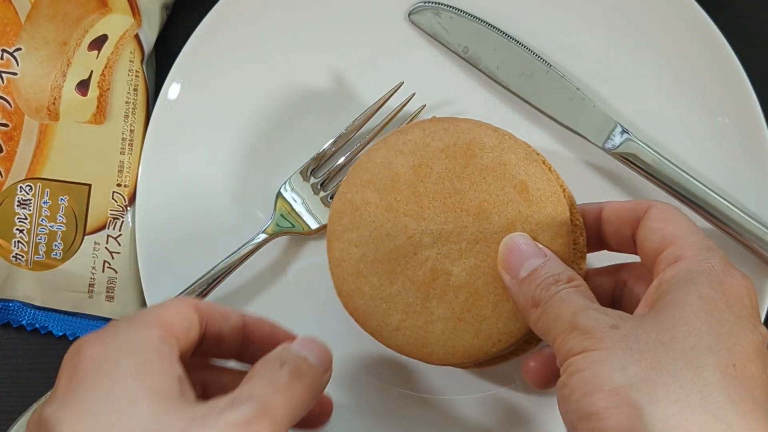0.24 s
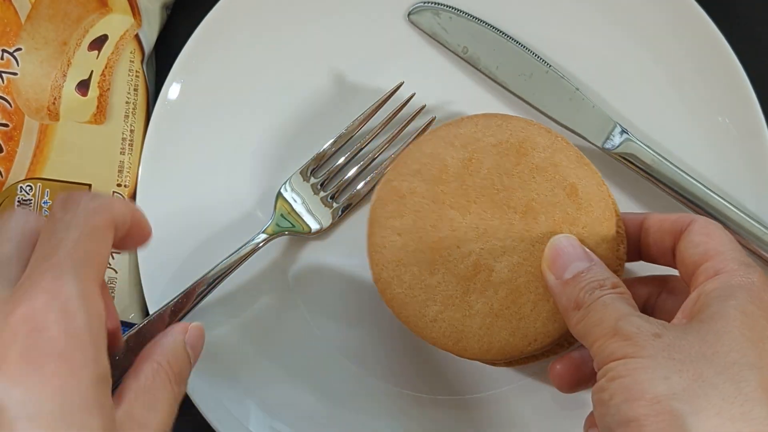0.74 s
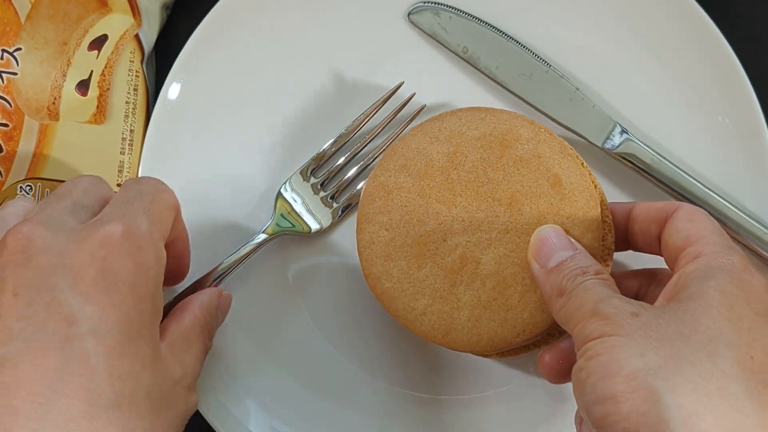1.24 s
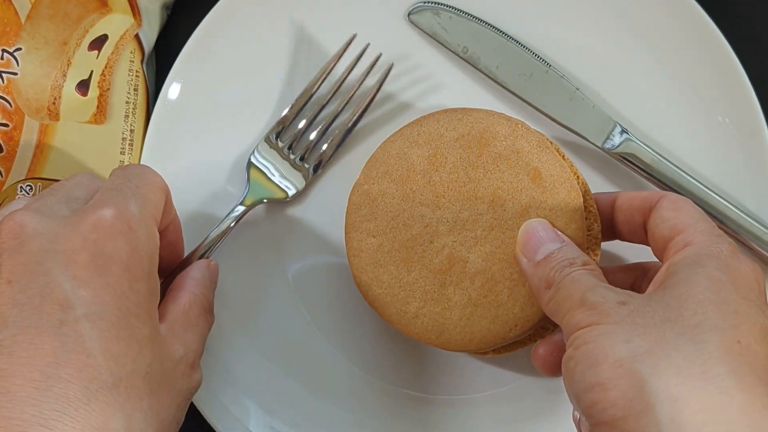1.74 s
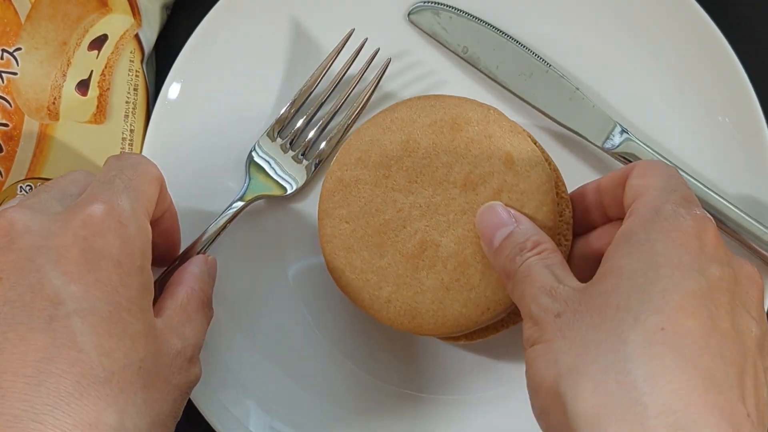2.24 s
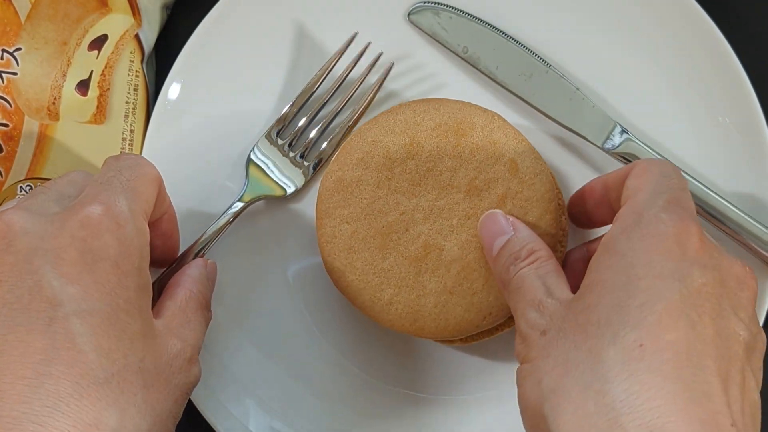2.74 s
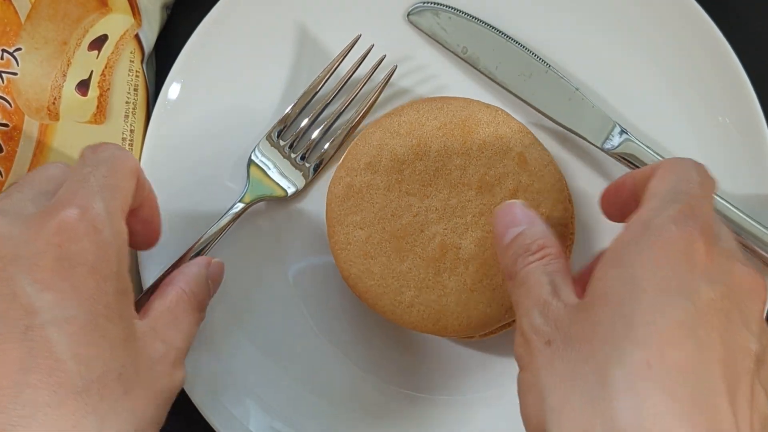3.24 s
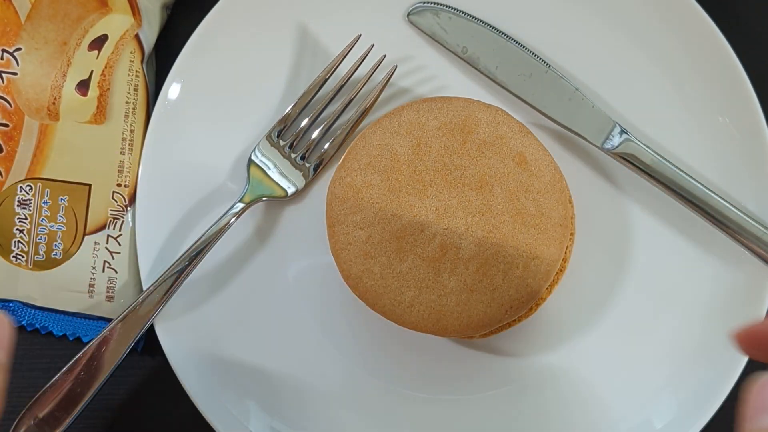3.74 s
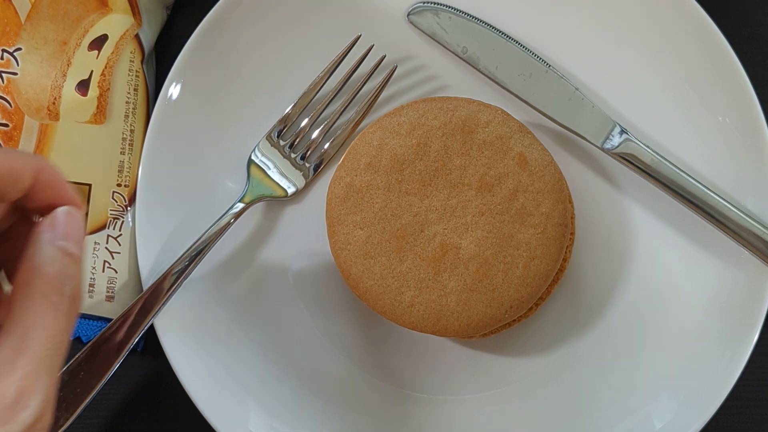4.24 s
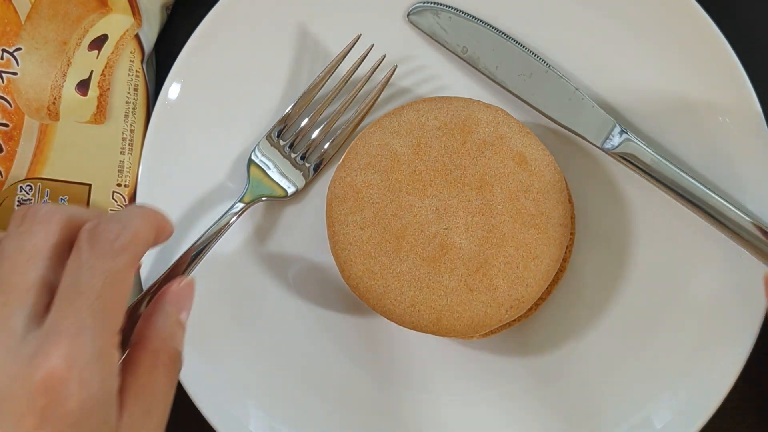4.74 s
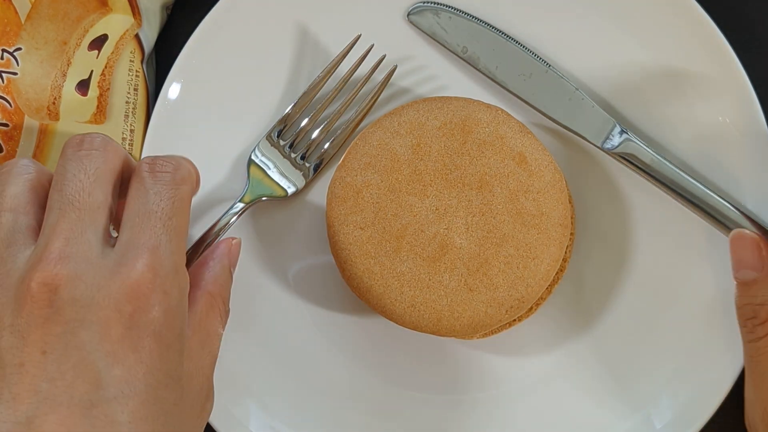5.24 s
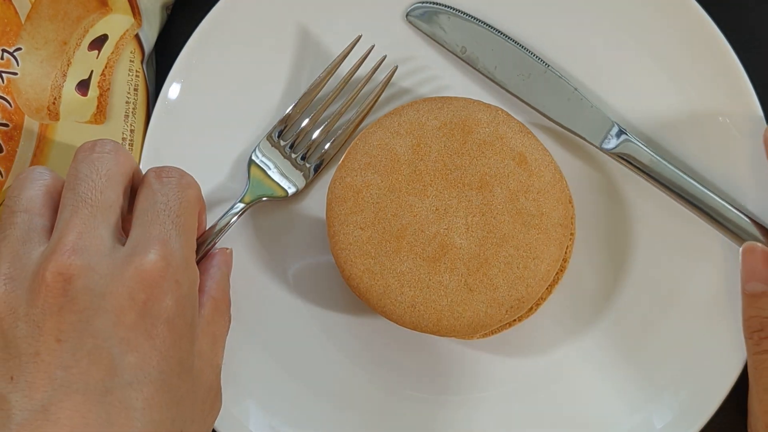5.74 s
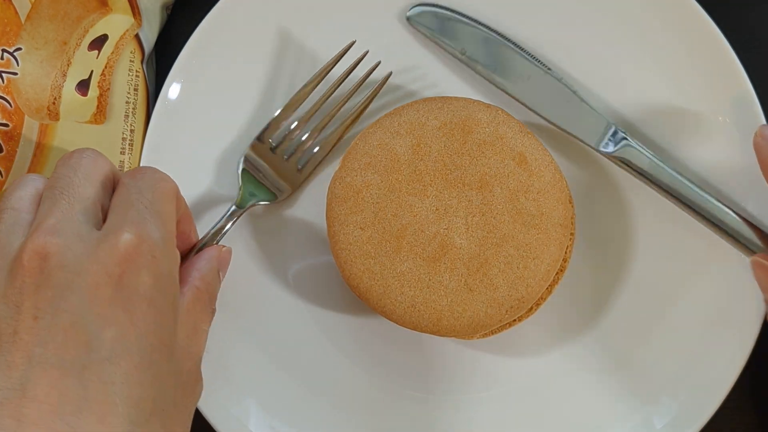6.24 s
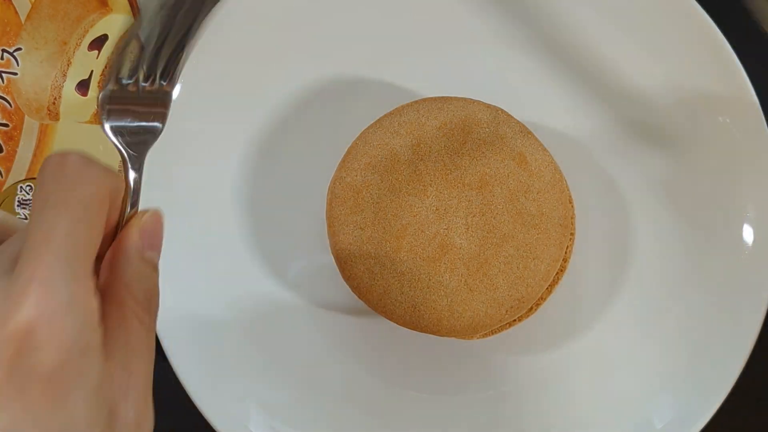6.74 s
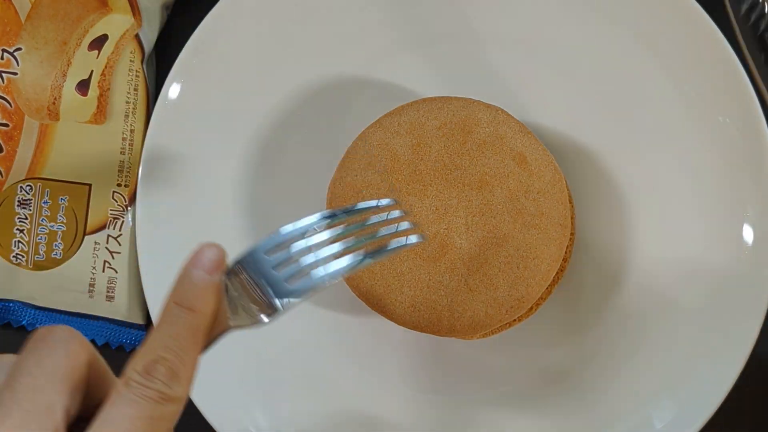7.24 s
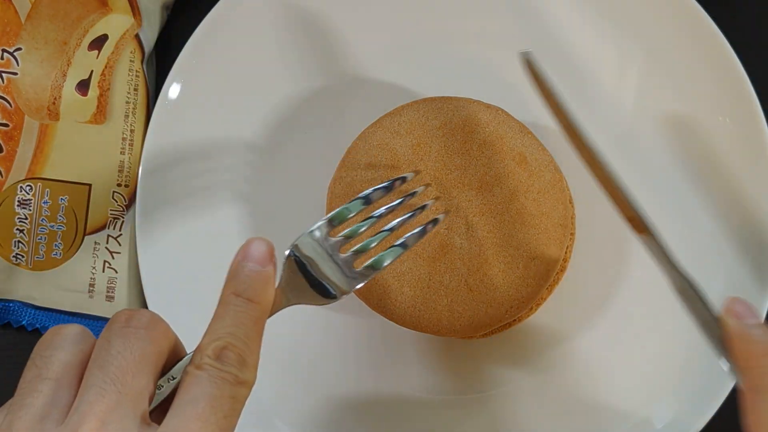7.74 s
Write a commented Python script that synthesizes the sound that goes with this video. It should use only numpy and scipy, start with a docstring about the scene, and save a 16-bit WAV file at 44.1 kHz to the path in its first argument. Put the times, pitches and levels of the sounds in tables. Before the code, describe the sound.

A steel fork and knife are nudged on a ceramic plate, close to the microphone. A sharp clink comes first, then light taps and small squeaky slides, then the loudest clink, which leaves the steel ringing. Hands knock and scuff softly on the table before one more bright clink and a short scrape as the cutlery is lifted. The room is quiet, with a faint motor hum.

```python
"""A sharp clink of steel on a ceramic plate, then more taps, rattles and slides of a fork and knife,
heard by a close pair of microphones. Each impact chatters briefly and excites the normal modes of the
plate and of the table, which thuds; free steel parts ring on, and sliding steel squeaks by stick-slip
friction. Hands scuff the table and a sleeve rustles. Behind them, in a quiet room with a short
reverberation, a small motor hums and a faint band of noise chirps upward again and again."""
import sys
import numpy as np
from scipy import signal
from scipy.fft import rfft, irfft
from scipy.io import wavfile
from scipy.ndimage import uniform_filter1d

SR = 44100
rng = np.random.default_rng(int(sys.argv[2]) if len(sys.argv) > 2 else 0)


def to_wav(sig):
    """Store sig (one row per channel, or 1-D mono) as 16-bit WAV at the path in sys.argv[1].

    Samples outside -1..1 are clipped; the rate is SR.
    """
    pcm = np.clip(np.atleast_2d(sig), -1, 1) * 32767
    pcm = np.round(pcm).astype(np.int16)
    wavfile.write(sys.argv[1], SR, pcm.T)  # frames by channels


N = 352834
TIME = np.arange(N) / SR
BIN_HZ = np.maximum(np.arange(N // 2 + 1) * SR / N, 1)
MIC_LAG_S = .00017  # path difference: the right microphone hears the plate later


def undb(db):
    return 10 ** (np.asarray(db) / 20)


def unit_rms(x):
    return x / np.sqrt(np.mean(x ** 2))


def unit_energy(x):
    return x / np.sqrt(np.sum(x ** 2))


def add(out, x, start_s):
    """Superposition: x is summed into out from start_s on."""
    i = int(start_s * SR)
    out[:, i:i + x.shape[1]] += x[:, :N - i]


def drive(force, response):
    """Convolution: a linear body answers each impulse of force with its impulse response."""
    return signal.fftconvolve(force[None], response, axes=1)[:, :N]


def colour(x, points):
    """Spectral shaping by (f/Hz, gain/dB) points, normalised to unit rms."""
    hz, db = np.transpose(points)
    f = np.maximum(np.arange(x.shape[-1] // 2 + 1) * SR / x.shape[-1], 1)
    return unit_rms(irfft(rfft(x) * undb(np.interp(np.log(f), np.log(hz), db)), x.shape[-1]))


def wander(rate_hz):
    """Random modulation: smoothed steps with a spread near 1."""
    k = int(SR / rate_hz)
    steps = np.repeat(rng.standard_normal(N // k + 1), k)
    return 1.5 * uniform_filter1d(uniform_filter1d(steps, k), k)[:N]


def impulses(samples, per_s, spread_db):
    """Poisson process: sparse contacts of random sign and size."""
    hit = rng.random(samples) < per_s / SR
    sign = rng.choice([-1, 1], samples)
    return hit * sign * undb(spread_db * np.minimum(rng.exponential(size=samples), 3))


def envelope(strokes, rise_db_s, fall_db_s, column=2):
    """Exponential growth and decay on either side of each stroke's held level."""
    rows = np.array(strokes)[:, :, None]
    early = np.maximum(rows[:, 0] - TIME, 0)
    late = np.maximum(TIME - rows[:, 0] - rows[:, 1], 0)
    return undb((rows[:, column] - rise_db_s * early - fall_db_s * late).max(0))


# anchors of a five-band tone colour: f/Hz
COLOUR_HZ = [1000, 2000, 3500, 6500, 12000]
def ring(modes, length_s, colour_db=(0,) * 5, scatter_db=0, detune=0, spread_rad=.6, lag_s=MIC_LAG_S):
    """Modal superposition: damped sinusoids, each with its own phase at the two microphones."""
    hz, db, t60 = np.transpose(modes)[:, :, None]
    t = np.arange(int(length_s * SR)) / SR
    level_draw, spread_draw, phase_draw, pitch_draw = rng.standard_normal((4, len(hz), 1))
    hz = hz * (1 + detune * pitch_draw)
    db = db + np.interp(np.log(hz), np.log(COLOUR_HZ), colour_db) + scatter_db * level_draw
    decay = undb(db - 60 * t / t60)
    phase = 2 * np.pi * hz * t + 3 * phase_draw
    apart = np.pi * hz * lag_s + spread_rad * np.minimum(hz / 2000, 1) * spread_draw
    return np.array([(decay * np.sin(phase + side * apart)).sum(0) for side in (1, -1)])


# spectrum of the room air: f/Hz, relative density/dB
AIR_SPECTRUM = [(15, -36.5), (32, -15.5), (55, -3.5), (80, -13.5), (92, -8.5), (114, -3.5), (134, -24),
                (158, -13), (191, -18.5), (431, -19), (849, -31), (1350, -37), (3570, -45.5),
                (16300, -62.5)]
# likeness of the air at the two microphones: f/Hz, correlation
AIR_COHERENCE = [(40, 0.97), (130, 0.86), (290, 0.7), (640, 0.53), (1410, 0.12), (3100, 0.033),
                 (15000, 0.02)]
def air():
    """Spatial coherence: ambient noise is alike at both microphones where its wavelength is long."""
    hz, correlation = np.transpose(AIR_COHERENCE)
    alike = np.interp(np.log(BIN_HZ), np.log(hz), correlation)
    mid, side = rfft(rng.standard_normal((2, N)))
    pair = irfft(np.sqrt(1 + alike) * mid + np.sqrt(1 - alike) * side * np.array([[1], [-1]]), N)
    return colour(pair, AIR_SPECTRUM) * undb(-64.5 + wander(3.3))


# spectral lines of the motor: f/Hz, width/Hz, level/dB
MOTOR_LINES = [(49.4, 8.2, -66.5), (101.6, 5.1, -74), (161, 2.7, -80.5), (216, 1.4, -87)]
def motor_hum(start_db=-10, run_up_s=2):
    """Line broadening: each line is a narrow noise band that swells as the motor comes up to strength."""
    run_up_db = start_db * np.maximum(1 - TIME / run_up_s, 0)
    out = np.zeros(N)
    for hz, width, db in MOTOR_LINES:
        line = rfft(rng.standard_normal(N)) / (1 + (2 * (BIN_HZ - hz) / width) ** 2)
        out += undb(db + run_up_db) * unit_rms(irfft(line, N))
    return out


def chirps(start_s=2.97, period_s=.283, climb_s=.035, low_hz=1260, high_hz=1460, width_hz=120):
    """Frequency modulation: a narrow noise band climbs, fades and starts again, slowly growing fainter."""
    age = (TIME - start_s) % period_s
    hz = high_hz - (high_hz - low_hz) * np.exp(-age / climb_s)
    lowpass = signal.butter(2, width_hz / 2, fs=SR, output="sos")
    slow = signal.sosfilt(lowpass, rng.standard_normal((2, 2, N)))
    carrier = np.exp(2j * np.pi * np.cumsum(hz) / SR)
    band = unit_rms(np.real((slow[0] + 1j * slow[1]) * carrier))
    db = -80 - 9 * age / period_s - 1.2 * (TIME - start_s) + 4.5 * wander(14)
    return band * undb(db) * np.minimum(age / .0033, 1) * (TIME > start_s)


def reverberation(direct, t60_s=.28, level_db=-16, coherent_below_hz=700):
    """Diffuse reflection: the walls return a dull decaying tail, alike on both sides only in the bass."""
    t = np.arange(int(.5 * SR)) / SR
    tail = colour(rng.standard_normal((2, len(t))), [(100, -2), (2000, -1), (16000, -8.5)])
    lowpass = signal.butter(1, coherent_below_hz, fs=SR, output="sos")
    tail = tail + signal.sosfilt(lowpass, tail[0] - tail)
    tail *= undb(-60 * t / t60_s) * (t > .006)
    return undb(level_db) * drive(direct.mean(0), np.sqrt(2) * unit_energy(tail))


# sleeve movements: t/s, duration/s, level/dB
RUSTLES = [(3.5, 0.4, -87), (4.1, 0.42, -84), (6.68, .006, -74), (6.78, 0.034, -79), (6.915, 0.0055, -71.5),
           (6.99, .04, -80)]
# spectrum of rubbing cloth: f/Hz, relative density/dB
CLOTH_SPECTRUM = [(1500, 4.5), (4000, -4), (8000, -2.5), (12000, -2), (16000, -7)]
def sleeve():
    """Friction noise: cloth gives a soft hiss with a slight grain."""
    grainy = rng.standard_normal((2, N)) * undb(2 * wander(60))
    return colour(grainy, CLOTH_SPECTRUM) * envelope(RUSTLES, rise_db_s=350, fall_db_s=264)


# modes of the table top: f/Hz, relative level/dB, free T60/s
TABLE_MODES = [(95, -13.5, .12), (177, -5.5, 0.19), (266, -3.5, 0.11), (316.4, -4.5, .13),
               (437, 0.5, 0.082), (579, -1.5, 0.072), (684, -5, 0.11)]
def table_pushed(bass_cut_hz=450):
    """Damped impulse response: a soft push gives a gradual onset, little bass and a short decay."""
    modes = [(hz, db + 9 * np.log2(min(hz / bass_cut_hz, 1)), .33 * t60) for hz, db, t60 in TABLE_MODES]
    response = ring(modes, .1)
    return response * np.minimum(TIME[:response.shape[1]] / .0013, 1) ** 2


def table_struck(thud_db):
    """Modal excitation: a heavier blow reaches the deeper modes of the table."""
    bass_db_per_octave = 2 + .15 * thud_db
    modes = [(hz, db + bass_db_per_octave * np.log2(300 / hz), t60) for hz, db, t60 in TABLE_MODES]
    return ring(modes, .25, scatter_db=1)


# hand and handle dragging on the table: t/s, duration/s, knock/dB, hiss/dB, treble hiss/dB
SCUFFS = [(4.535, 0.012, -48.5, -48, -53), (4.63, 0.014, -63, -65, -71), (4.72, 0.081, -75.5, -84, -80.5),
          (5.355, .085, -51.5, -66.5, -76.5), (5.475, 0.031, -66, -83, -77.5),
          (5.527, 0.0034, -47.5, -64.5, -74), (5.635, 0.031, -69.5, -91, -85)]
# spectrum of the scuffing hiss: f/Hz, relative density/dB
SCUFF_SPECTRUM = [(600, -16.5), (1150, -16), (1900, -4), (2800, 4.5), (4500, -12), (7000, -44.5)]
def scuffs():
    """Roughness excitation: dragging knocks the table's modes unevenly; skin and steel hiss in grains."""
    knock_gain, hiss_gain, treble_gain = (
        envelope(SCUFFS, rise_db_s=900, fall_db_s=418, column=k) for k in (2, 3, 4))
    table = table_pushed()
    knock = unit_rms(drive(impulses(N, per_s=900, spread_db=3.45), table))
    grains = impulses(N, per_s=6000, spread_db=1.4) + .5 * rng.standard_normal((2, N))
    grains[1] = np.roll(grains[1], int(MIC_LAG_S * SR))
    hiss, treble = colour(grains, SCUFF_SPECTRUM), colour(grains, CLOTH_SPECTRUM)
    return knock * knock_gain + hiss * hiss_gain + treble * treble_gain


# modes of each steel part: f/Hz, relative level/dB, T60/s
STEEL_MODES = {"blade": [(846, -9, 1.), (865, -12, 1.4), (3930, 2, .6), (6130, -3, .4)],
               "tines": [(4130, 0, .8), (4810, -12, .2)], "neck": [(921, -15, .5), (1488, 3, .6),
               (1933, -9, .4), (2826, -6, .3), (14790, -12, 0.22)], "handle": [(1733, -3, 0.55),
               (1815, 4, 0.22), (10150, -5, .15)]}
# parts left ringing: t/s, part, level/dB, duration/s
STEEL_RINGS = [(.17, "handle", -39.5, 0.27), (1.091, "handle", -78.5, 0.18), (2.155, "tines", -56.5, 0.099),
               (2.28, "blade", -69.5, 0.16), (2.535, "tines", -67, .25), (2.812, "blade", -48, 1.2),
               (2.812, "tines", -53, 1.), (3.213, "tines", -72.5, 0.41), (6.0, "neck", -68, 0.2),
               (6.22, "neck", -49.5, 0.24), (6.22, "blade", -53, 0.22), (6.22, "tines", -58, 0.2)]
def steel_rings(attack_s=.0037, damping_s=.03):
    """Free vibration: lightly damped steel rings on until a hand or the plate stops it."""
    out = np.zeros((2, N))
    for start_s, part, db, held_s in STEEL_RINGS:
        tone = ring(STEEL_MODES[part], held_s, spread_rad=.2, lag_s=.00005)
        t = TIME[:tone.shape[1]]
        gate = np.clip(np.minimum(t / attack_s, (held_s - t) / damping_s), 0, 1)
        add(out, undb(db) * tone * gate, start_s)
    return out


# modes of the ceramic plate: f/Hz, relative level/dB, T60 before added damping/s
PLATE_MODES = [(695, -10, 0.11), (1372, -18.5, 0.32), (1685, -9, 0.012), (1818, -4.5, .2),
               (1870, 5.5, 0.041), (2194, -0.5, 0.033), (2357, -8.5, 0.065), (2867, -11.5, 0.16),
               (3210, -10, 0.55), (3460, -9, 0.23), (3864, -4, .09), (4402, -11, 0.042), (4865, -12, 0.32),
               (5080, -12, 0.25), (5650, -22.5, 0.033), (5912, -15.5, .13), (6730, -16, 0.51),
               (6760, -18.5, .13), (7535, -14, 0.17), (7835, -16.5, 0.04), (8520, -9.5, 0.3),
               (8840, -9, .14), (10370, -6.5, 0.19), (10780, -13, 0.19), (11100, -23, 0.17),
               (12400, -16, 0.36), (12042, -17, 0.12), (13530, -22, .11), (14500, -20, 0.11)]
def plate(colour_db, scatter_db, contact_s=.00027, longest_t60_s=.085, crack_t60_s=.074):
    """Modal overlap: a contact rings the clear modes, and the many small ones blur into a crack."""
    # the food and the table top shorten the rings
    damped = [(hz, db, min(.43 * t60, longest_t60_s)) for hz, db, t60 in PLATE_MODES]
    clear = ring(damped, .25, colour_db, scatter_db, detune=.004)
    t = TIME[:clear.shape[1]]
    crack_db = np.array(colour_db) + [-8, -3, -3.5, -8, -9]
    spectrum = [(300, crack_db[0] - 15), *zip(COLOUR_HZ, crack_db),
                (14500, crack_db[-1] - 4), (16500, crack_db[-1] - 30)]
    shared, separate = rng.standard_normal(len(t)), rng.standard_normal(clear.shape)
    crack = colour(shared + .93 * separate, spectrum)
    crack[1] = np.roll(crack[1], int(MIC_LAG_S * SR))
    crack *= undb(-60 * t / crack_t60_s)
    onset = np.sin(np.pi / 2 * np.minimum(t / contact_s, 1)) ** 2
    return onset * (unit_energy(clear) + .45 * unit_energy(crack))


# steel sliding over the glaze: t/s, duration/s, force level/dB, squeak f/Hz
SLIDES = [(1.364, 0.015, -53, 2210), (1.47, 0.043, -59, 2620), (1.55, 0.05, -42.5, 1990),
          (1.601, 0.047, -47.5, 2210), (1.702, 0.067, -43.5, 1940), (5.369, 0.065, -48.5, 1080),
          (5.472, 0.011, -59.5, 1900), (5.522, 0.0084, -45.5, 1450), (6.3, 0.031, -46, 2820),
          (6.372, 0.011, -43, 1920), (6.416, 0.022, -59, 2720)]
def slides(squeak_db=2.5, squeak_t60_s=.071):
    """Stick-slip friction: small slips drive the plate, and each stroke squeaks at its own pitch."""
    out = np.zeros((2, N))
    slips = impulses(N, per_s=500, spread_db=3.7)
    body = plate((1.5, -2, -6, -24.5, -41), scatter_db=.9)  # soft contact holds the treble down
    for stroke in SLIDES:
        squeak = ring([(stroke[3], 0, squeak_t60_s)], .25, spread_rad=.88)
        force = slips * envelope([stroke], rise_db_s=901, fall_db_s=457)
        out += drive(force, body + undb(squeak_db) * unit_energy(squeak))
    return out


def chatter(rattle_s, bounce_s=.012):
    """Inelastic rebound: after the first contact the steel bounces on the glaze until it settles."""
    t = np.arange(int(.2 * SR)) / SR
    build_up = np.minimum(.69 + t / .0066, 1)
    settling = np.exp(-(t / rattle_s) ** 3)
    hardness = 1 + 1.8 * np.exp(-t / bounce_s)  # the first bounces are the hardest
    force = impulses(len(t), per_s=1500, spread_db=4) * build_up * settling * hardness
    force[0] = 2.2  # first contact
    return force


# cutlery striking the plate: t/s, nominal peak level/dB, thud re clink/dB, colour at 1 kHz/dB,
# added treble slope/(dB per octave), rattle duration/s
TAPS = [(0.166, -17, -21.5, -8, -1, 0.047), (1.087, -53.5, -6.5, -3, -10.5, 0.022),
        (1.552, -49, -11, -2, -12, 0.0082), (1.6846, -52.5, -7.5, -3, -37, 0.025),
        (1.733, -44, -8, -11, -5.5, 0.016), (2.02, -49.5, -19, -21, -17, 0.012),
        (2.149, -35, -13, 1.5, -1.5, 0.038), (2.2741, -33, -13.5, -2.5, -2, 0.047),
        (2.53, -40, -18.5, 0.5, -1, 0.024), (2.808, -14, -22.5, -7, 1, 0.055),
        (3.2071, -36.5, -4, -6.5, -4.5, 0.038), (5.094, -53, -6, -13, -9, 0.019),
        (5.374, -45.5, -0.5, 15, -5, 0.0069), (5.633, -69.5, -7.5, -6, -10, .03),
        (5.995, -44.5, -25, -7, -12.5, 0.034), (6.076, -50.5, -14.5, -0.5, -11, 0.025),
        (6.2135, -21.5, -24.5, -6.5, 1.5, 0.051)]
def taps(crest_db=5, left_bias_db=2.23, treble_db=(-4.5, -4.5, -8.5)):
    """Impact excitation: one chattering force makes the plate clink and the table thud."""
    out = np.zeros((2, N))
    octaves = np.log2(np.array(COLOUR_HZ[2:]) / COLOUR_HZ[1])
    pan_db = np.array([[.5], [-.5]]) * left_bias_db
    for start_s, peak_db, thud_db, low_db, slope_db, rattle_s in TAPS:
        force = chatter(rattle_s)
        colour_db = (low_db, 0, *(treble_db + slope_db * octaves))
        clink = drive(force, plate(colour_db, scatter_db=2.2))
        thud = drive(force, table_struck(thud_db))
        clink /= np.sqrt(np.mean(clink[:, :900] ** 2))  # unit rms over the attack
        thud /= np.sqrt(np.mean(thud[:, :1800] ** 2))
        add(out, (clink + undb(thud_db) * thud) * undb(peak_db - crest_db + pan_db), start_s)
    return out


def scene():
    """Superposition: the direct sound, its reverberation and the background add at the microphones."""
    direct = taps() + steel_rings() + slides() + scuffs() + sleeve()
    return direct + reverberation(direct) + air() + motor_hum() + chirps()


def record(dry):
    """Band limiting: the recorder cuts the deep rumble and the top."""
    highpass = signal.butter(6, 38, "high", fs=SR, output="sos")
    lowpass = signal.ellip(10, .2, 70, 16250, fs=SR, output="sos")
    return signal.sosfilt(lowpass, signal.sosfilt(highpass, dry))


dry = scene()
out = record(dry)
to_wav(out)
```